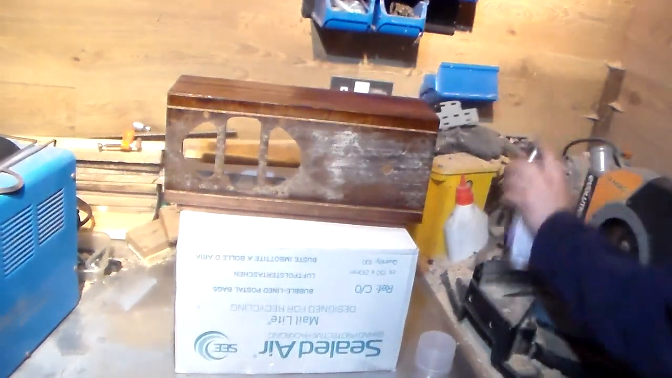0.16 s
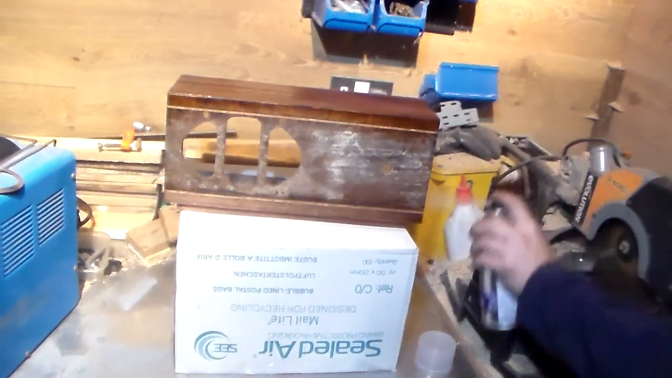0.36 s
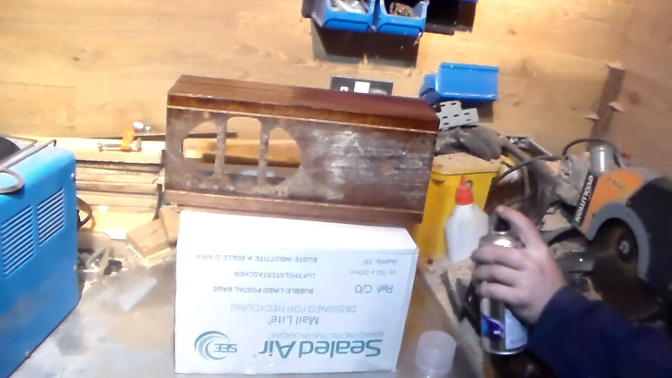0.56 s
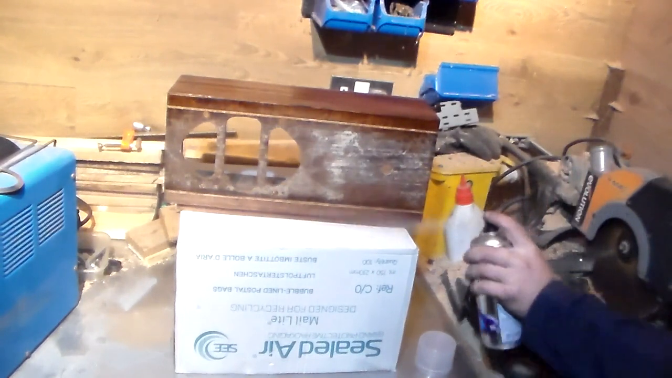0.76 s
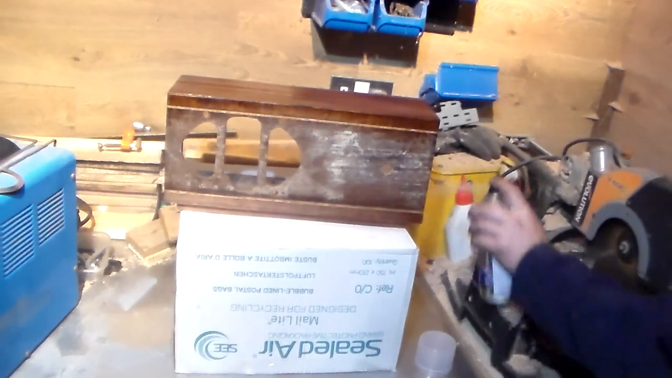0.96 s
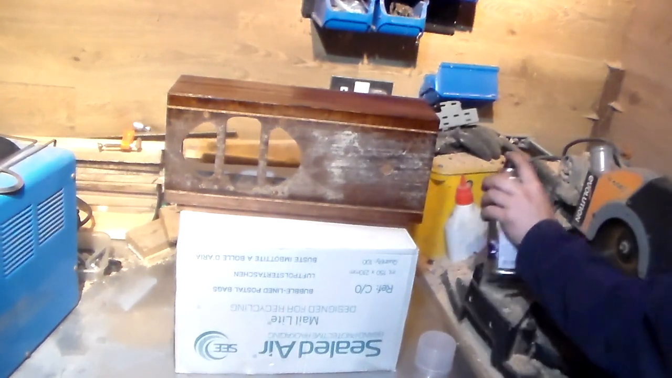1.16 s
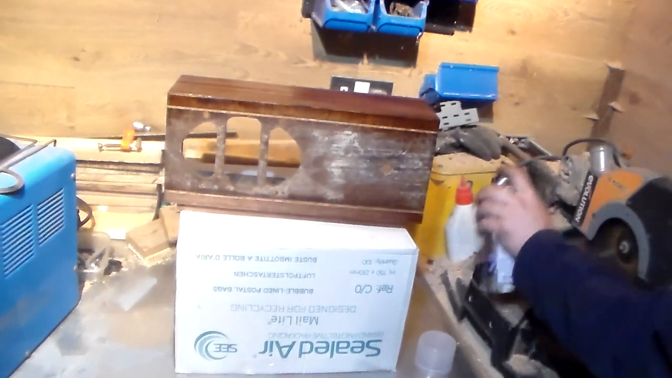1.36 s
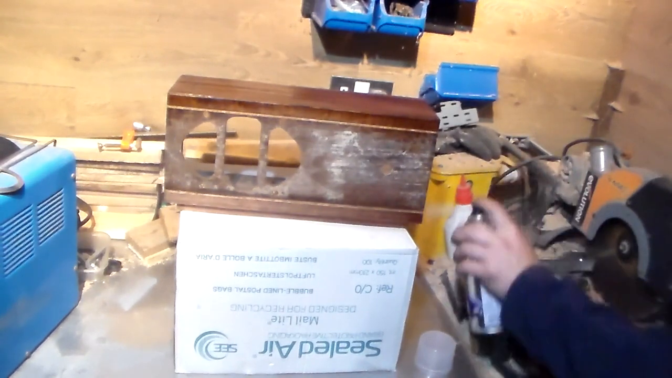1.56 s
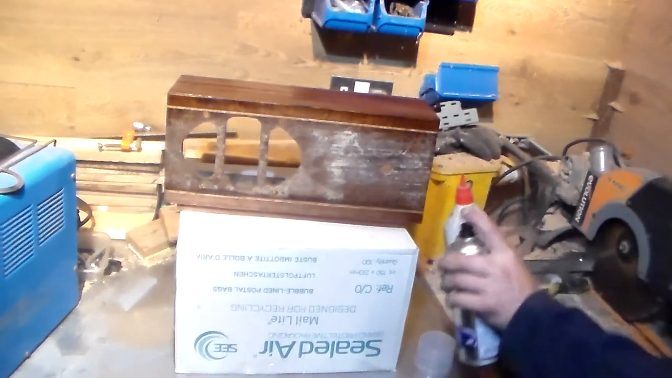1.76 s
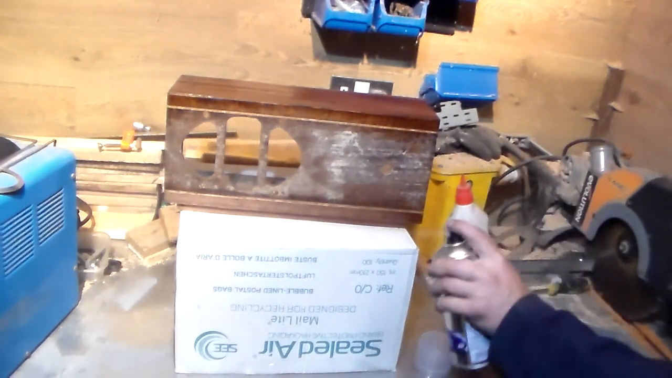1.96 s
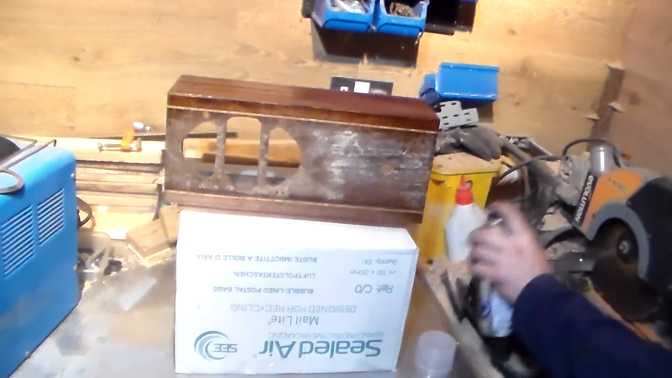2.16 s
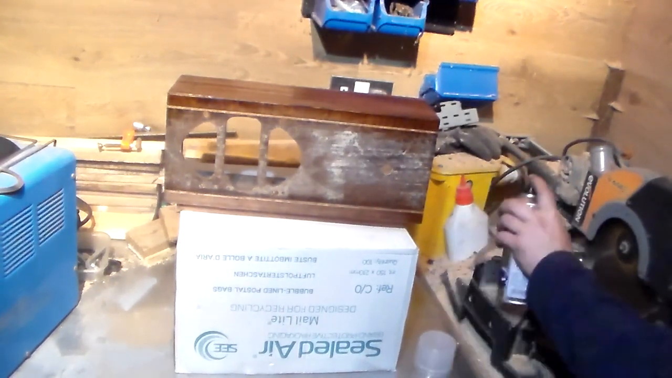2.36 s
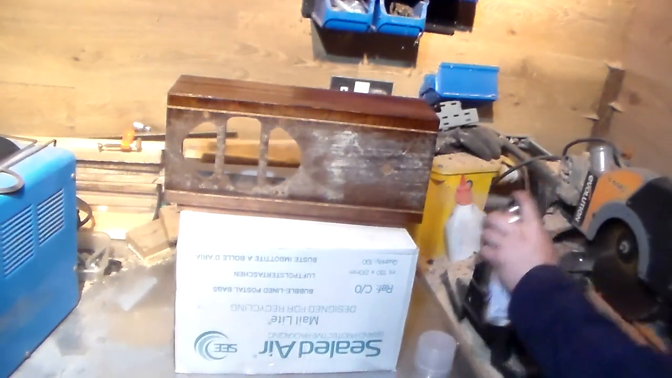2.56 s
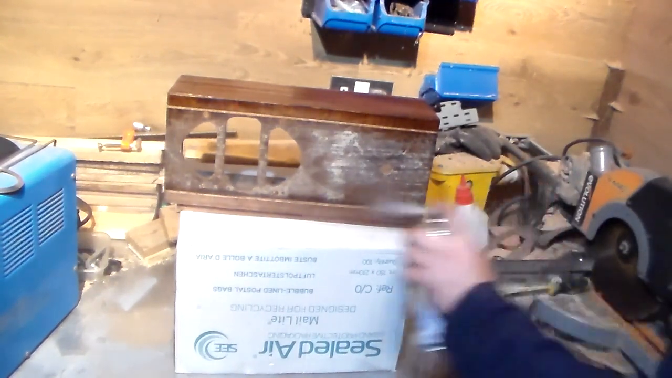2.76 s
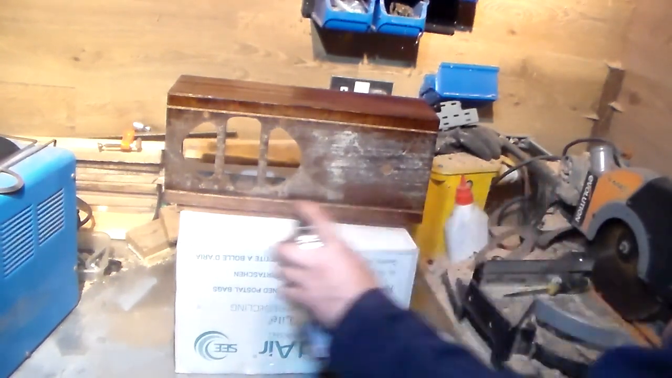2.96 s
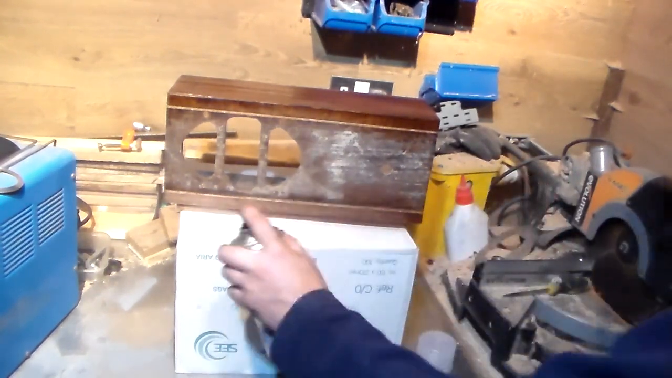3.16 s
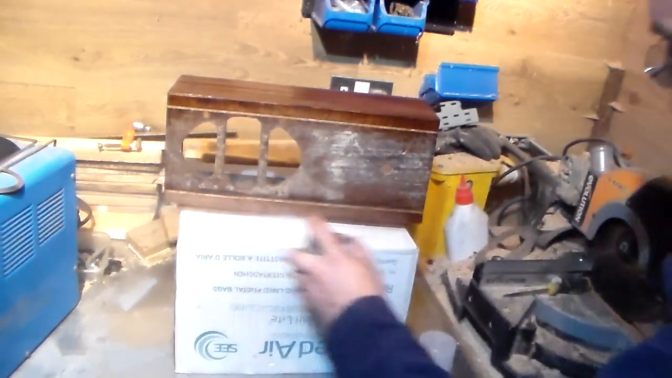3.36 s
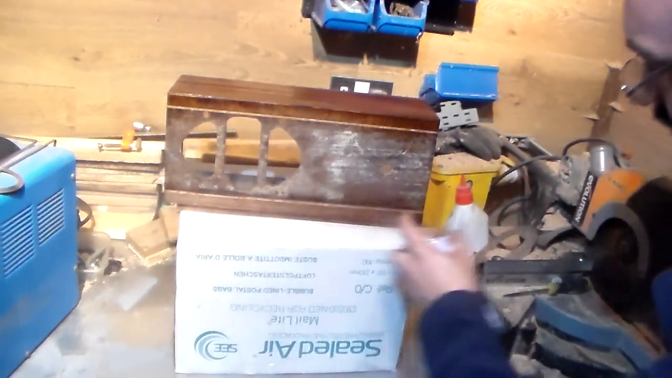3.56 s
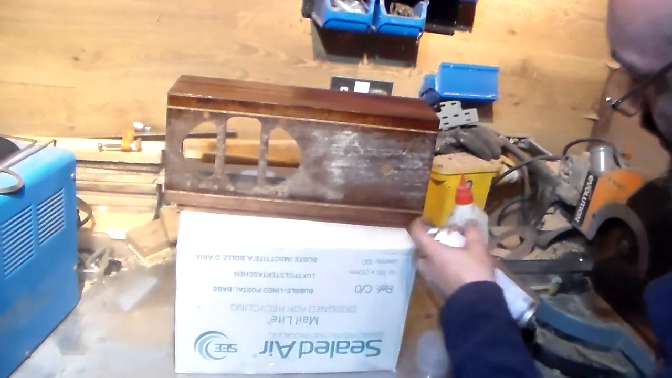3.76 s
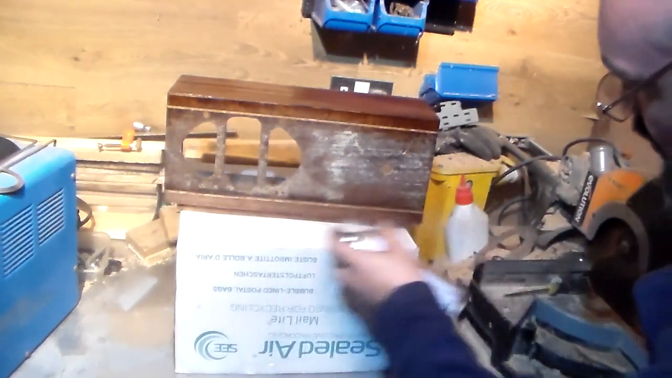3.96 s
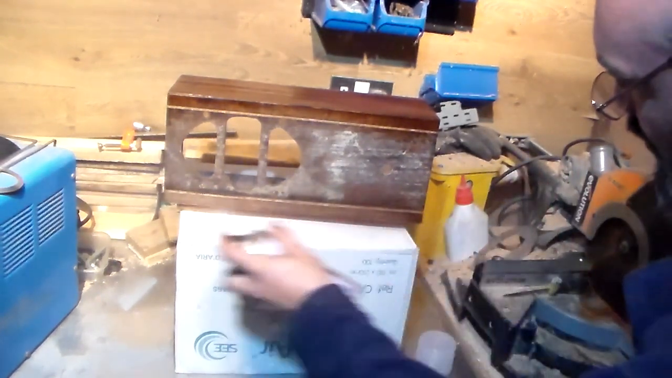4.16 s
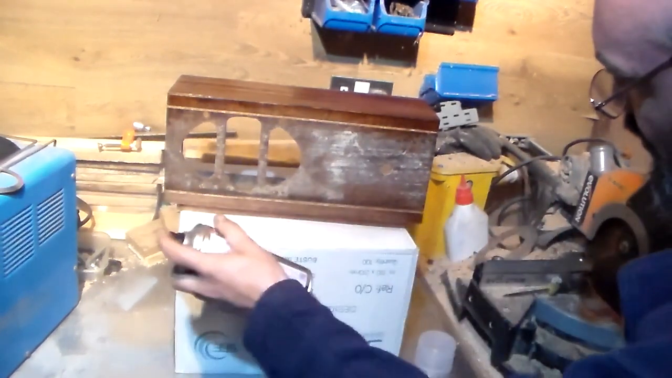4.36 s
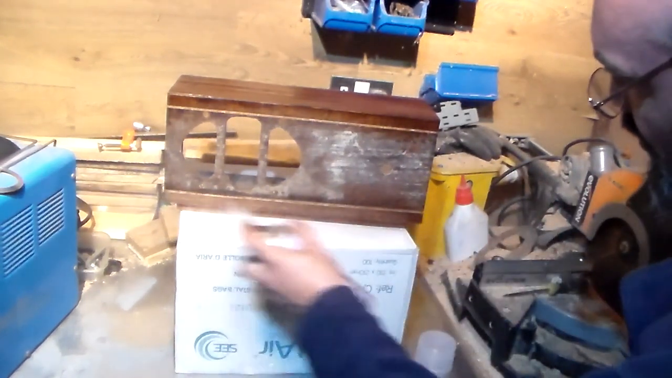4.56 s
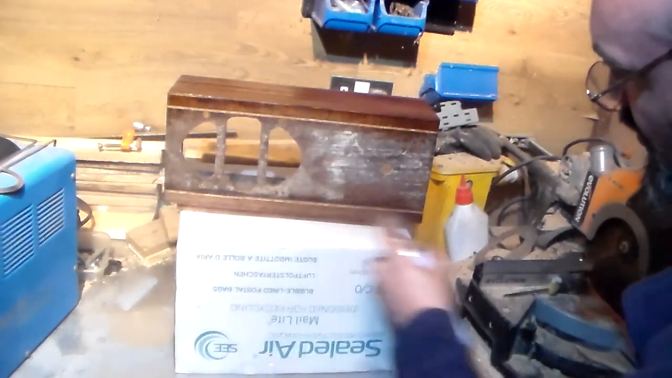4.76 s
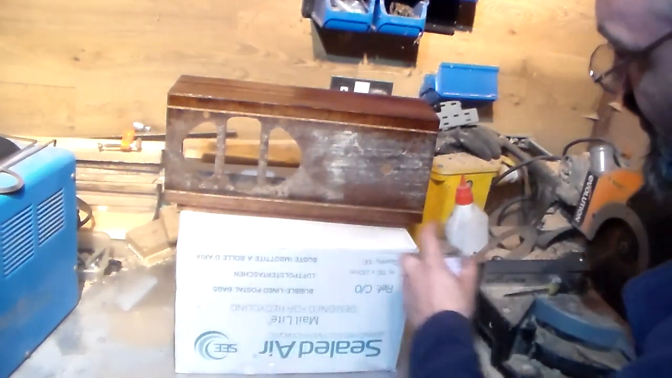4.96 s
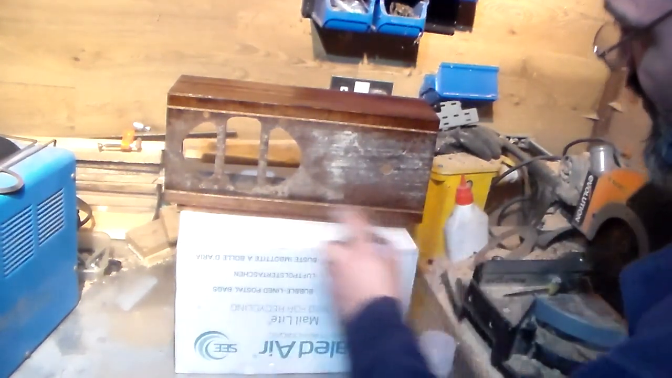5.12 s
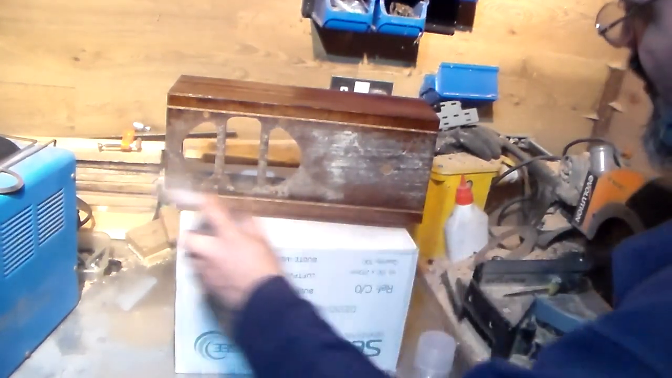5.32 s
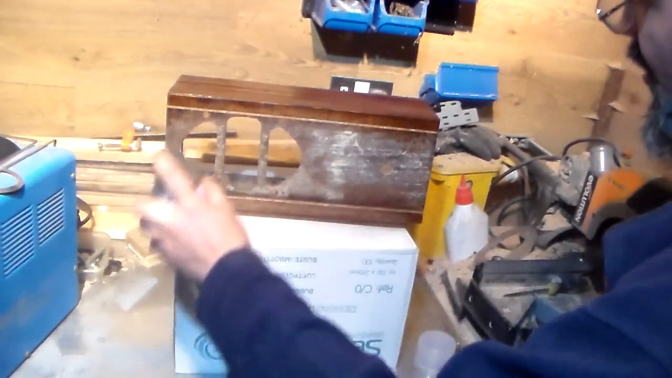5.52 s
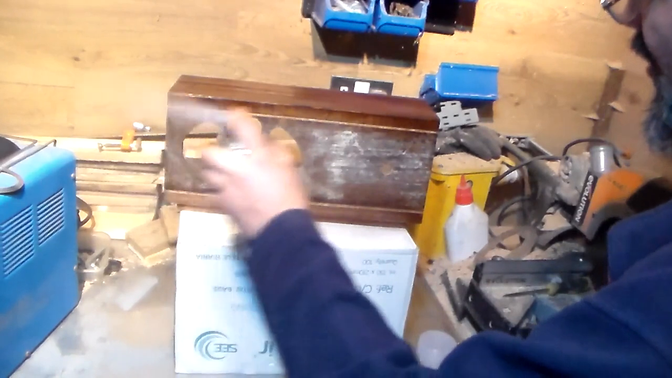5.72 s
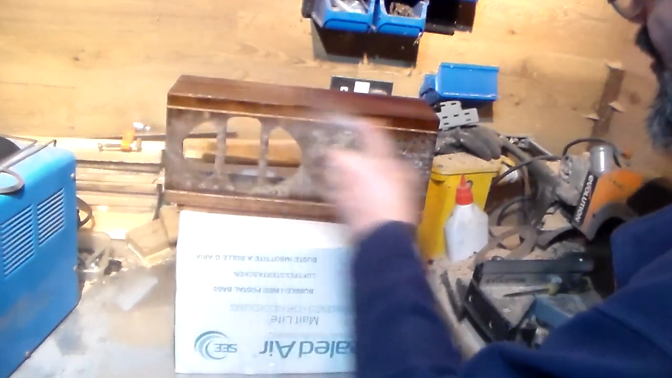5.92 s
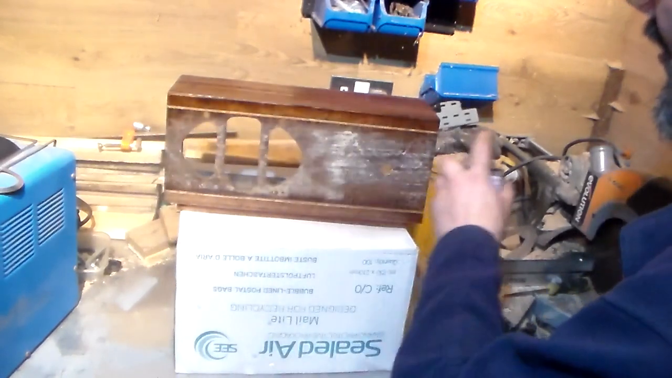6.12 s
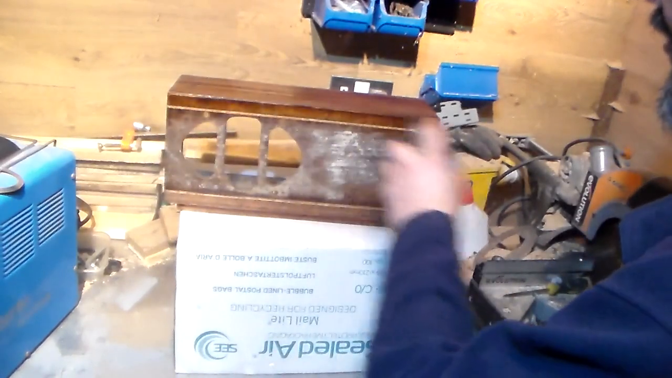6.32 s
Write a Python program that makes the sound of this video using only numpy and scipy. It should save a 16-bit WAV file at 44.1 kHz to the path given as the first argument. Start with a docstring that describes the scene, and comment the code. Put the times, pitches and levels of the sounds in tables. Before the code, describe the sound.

Short, crisp spray-can hisses with brief pauses, metallic ball clicks and rolls between them, one dull wooden knock, faint low hum behind.

```python
"""An aerosol can sprays lacquer on a wooden piece in short bursts, heard in stereo in a small workshop.
Filtered noise makes the nozzle's hiss, the splash and the wood's boom; a bench echo slides as the hand sweeps.
Between bursts the mixing ball rolls (noise around the can's modes) and clicks (noise cracks, ringing modes).
Narrow swishes glide past, and once something wooden is bumped: a dull crack and damped modes.
Behind it all lie faint air noise, a low machine drone and mains hum."""
import sys
import numpy as np
from scipy import signal
from scipy.fft import rfft, irfft, next_fast_len
from scipy.io import wavfile
from scipy.ndimage import uniform_filter1d, map_coordinates

SR = 44100
rng = np.random.default_rng(int(sys.argv[2]) if len(sys.argv) > 2 else 0)


def bounce(signal):
    """Save signal as a 16-bit WAV file at the path given by the first command-line argument."""
    frames = np.transpose(np.atleast_2d(signal))
    limited = np.clip(frames, -1, 1)
    pcm = np.round(limited * 32767).astype(np.int16)
    wavfile.write(sys.argv[1], SR, pcm)


N = 286032


def amp(db):
    """Decibels to gain."""
    return 10 ** (np.asarray(db) / 20)


def unit(x):
    """Scale to rms 1."""
    return x / np.sqrt(np.mean(x ** 2) + 1e-20)


def along(points, hz):
    """(frequency [Hz], value) points read on a log frequency axis."""
    point_hz, value = np.transpose(points)
    return np.interp(np.log(hz + 1), np.log(point_hz), value)


def wobble(rate):
    """A smooth random curve, rate knots a second."""
    knots = rng.standard_normal(int(N * rate / SR) + 4)
    return map_coordinates(knots, [np.arange(N) * rate / SR])


def filtered(x, response):
    """x times a response of frequency."""
    size = x.shape[-1]
    padded = next_fast_len(size + 8192)
    gain = response(np.fft.rfftfreq(padded, 1 / SR))
    return irfft(rfft(x, padded) * gain, padded)[..., :size]


def noise(colour, width, size=N):
    """Left and right noise whose middle has rms 1; colour is a gain of frequency."""
    mid, side = filtered(rng.standard_normal((2, size)), colour)
    side = filtered(side, lambda hz: amp(along(width, hz)))
    return np.array([mid + side, mid - side]) / np.std(mid)


def add(track, s, sound):
    """Mix a sound in at time s."""
    part = track[:, round(s * SR):][:, :sound.shape[-1]]
    part += sound[:, :part.shape[-1]]


def stroke(s, held_s, rise_s, release_s):
    """Gain of one gesture: it rises from time s, holds, then falls ever faster, by 60 dB in release_s."""
    rise_ease = 1.56  # above 1, a gesture starts gently
    t = np.maximum(np.arange(N) / SR - s, 0)
    closing = np.clip((t - held_s) / release_s, 0, 2)
    return (1 - np.exp(-t / rise_s)) ** rise_ease * amp(-60 * closing ** 2)


def ramp(s, length_s):
    """Runs from -1/2 to 1/2 over a gesture."""
    return np.clip((np.arange(N) / SR - s) / length_s, 0, 1) - .5


# stereo spread of the near sounds at the two microphones: (frequency [Hz], side minus mid [dB])
NEAR_WIDTH = [(100, -22), (400, -19), (1500, -29), (3300, -29), (4000, -10), (4800, -7), (6500, -4),
              (8200, -2), (11000, -1.5), (14000, -.7)]


def ring(modes, t, scatter_db, rise_cycles):
    """Damped modes that build up over a few cycles; high ones reach the two microphones out of step."""
    out = np.zeros((2, len(t)))
    for hz, db, t60 in modes:
        lead = np.arctan(amp(along(NEAR_WIDTH, hz)))
        phase = rng.uniform(0, 2 * np.pi) + np.array([[lead], [-lead]])
        rise = 1 - np.exp(-t * hz / rise_cycles)
        decay = amp(db + rng.normal(0, scatter_db) - 60 * t / t60)
        out += decay * rise * np.sin(2 * np.pi * hz * t + phase)
    return out


def gliding(centre_hz, width_hz):
    """A narrow band of noise of rms 1 around a moving centre: low noise multiplied by a gliding sine."""
    mean_hz = np.mean(centre_hz)
    spread = [(mean_hz, along(NEAR_WIDTH, mean_hz))]
    band = noise(lambda hz: 1 / (1 + (hz / width_hz) ** 2), spread, size=len(centre_hz))
    return np.sqrt(2) * band * np.sin(2 * np.pi * np.cumsum(centre_hz) / SR)


# the workshop's air noise: (frequency [Hz], relative density [dB per Hz])
AIR_COLOUR = [(12, -34.5), (20, 1.5), (52, -12), (176, -20.5), (304, -23.5), (513, -26.5), (573, -24.5),
              (754, -27), (1080, -27), (1720, -29), (1970, -27), (2270, -30), (2670, -27.5), (3820, -31.5),
              (14300, -38)]
# its stereo spread: (frequency [Hz], side minus mid [dB])
AIR_WIDTH = [(25, -7), (70, -3.5), (300, -1.5), (1500, -4), (4000, -3), (12000, 1)]


def background():
    """The workshop's faint air noise with a low machine drone and mains hum, both wavering in level."""
    t = np.arange(N) / SR
    air = amp(-56.5) * noise(lambda hz: amp(along(AIR_COLOUR, hz)), AIR_WIDTH)
    drone = amp(-56.5 + 2 * wobble(5)) * np.sin(2 * np.pi * 25 * t)
    hum = amp(-62 + 2.2 * wobble(2.94)) * np.sin(2 * np.pi * 50 * t)
    return air + drone + hum


# reverberation of the small workshop: (frequency [Hz], time to fall 60 dB [s])
ROOM_T60 = [(150, 0.41), (1000, 0.17), (5000, 0.17), (14000, 0.1)]


def room(x):
    """The small room's tail of decaying noise, each frequency dying at its own speed."""
    burst = noise(np.ones_like, NEAR_WIDTH, size=SR // 2)
    hz, t, spectrum = signal.stft(burst, SR, nperseg=256)
    decay = amp(-60 * t / along(ROOM_T60, hz)[:, None])
    tail = signal.istft(spectrum * decay, SR, nperseg=256)[1]
    # the tail begins 5 ms after the direct sound
    tail = np.pad(tail / np.linalg.norm(tail[0]), ((0, 0), (SR // 200, 0)))
    return signal.fftconvolve(x, tail, axes=1)[:, :N]


# a wooden bump and its softer rebounds:
# (time [s], relative level [dB], highest frequency that the contact excites [Hz])
WOOD_BUMPS = [(1.127, -22.5, 6000), (1.165, -34.5, 1200), (1.243, -35.5, 1500)]
# modes of the wood: (frequency [Hz], relative level [dB], time to fall 60 dB [s])
WOOD_MODES = [(60, -19, .2), (110, -17, .28), (164, -13, .23), (239, -4, .12), (256, -4, .15),
              (297, -9, 0.17), (330, -10.5, 0.15), (395, -10, .1), (618, -6.5, 0.1), (792, -4, .11),
              (1105, -7.5, 0.12), (1720, -8, 0.044), (1920, -5, 0.066), (3157, 2, .07)]
# dull crack of the contact: (frequency [Hz], relative density [dB per Hz])
THUD_COLOUR = [(70, -18), (300, -2), (600, 0.5), (1200, -2), (1800, 3.5), (3200, -5), (4200, -5),
               (9000, -33)]


def bumps():
    """Something wooden is knocked and settles: a dull crack, then its modes swell and die."""
    out, t = np.zeros((2, N)), np.arange(SR // 2) / SR
    for s, db, contact_hz in WOOD_BUMPS:
        crack = noise(lambda hz: amp(along(THUD_COLOUR, hz)), NEAR_WIDTH, size=len(t))
        crack *= amp(-60 * t / 0.13)
        blow = crack + amp(-2) * ring(WOOD_MODES, t, scatter_db=0.5, rise_cycles=3.2)
        # a softer contact leaves the highs out
        add(out, s, amp(db) * filtered(blow, lambda hz: 1 / (1 + (hz / contact_hz) ** 4)))
    return out


# the ball striking the can:
# (time [s], relative level [dB], relative level of the two low wall modes within the click [dB])
BALL_CLICKS = [(0.177, -28, -18), (0.2105, -23, -24), (0.2394, -18, -25), (1.2008, -21, -30),
               (2.452, -23, -14), (2.455, -20.5, -19), (2.475, -29, -12), (3.093, -37, -4),
               (4.0982, -17.5, -6.5), (6.2009, -20.5, -17), (6.3177, -21, -0.5), (6.3218, -20, -7),
               (6.3674, -19.5, -25)]
# modes of the can's steel wall: (frequency [Hz], relative level [dB], time to fall 60 dB [s])
CAN_MODES = [(1880, -5, 0.084), (2024, -2.5, 0.048), (4420, -1, .07), (4550, -2.5, 0.13),
             (5700, -15, 0.091), (6430, -12, 0.09), (7330, 1, 0.077), (7600, -20, .07), (8900, -4, .08),
             (9700, -11, 0.094), (10610, -21, .07), (12200, -17, .07)]
# crack of the ball on steel: (frequency [Hz], relative density [dB per Hz])
STEEL_COLOUR = [(1200, -38.5), (1900, -6), (3000, -2.5), (5000, 2), (7200, -0.5), (10000, -5),
                (14000, -11.5)]


def clicks():
    """The ball hits the wall: a short rattling crack and the ring of the steel."""
    out, t = np.zeros((2, N)), np.arange(SR // 4) / SR
    for s, db, low_db in BALL_CLICKS:
        crack = noise(lambda hz: amp(along(STEEL_COLOUR, hz)), NEAR_WIDTH, size=len(t))
        crack *= amp(-60 * t / 0.12)
        low = ring(CAN_MODES[:2], t, scatter_db=0, rise_cycles=2)
        high = ring(CAN_MODES[2:], t, scatter_db=2.5, rise_cycles=3)
        click = amp(-13.5) * crack + amp(low_db - 3.5) * low + amp(-14) * high
        add(out, s, amp(db) * click)
    return out


def wall(hz, modes):
    """Gain of the can's wall: the lacquer and the hand broaden each mode."""
    power = 0
    for mode_hz, db, t60 in modes:
        power = power + amp(db) ** 2 / (1 + ((hz - mode_hz) * t60 / 5) ** 2) ** 1.4
    return np.sqrt(power)


# the ball rolling round the can's base: (time [s], length [s], relative rolling level [dB],
# relative scraping level [dB], swell from start to end [dB],
# main mode, which the shifting lacquer pulls down [Hz])
BALL_ROLLS = [(.03, 0.18, -53.5, -58, 12, 4510), (.66, 0.14, -66, -64, 11, 4510),
              (1.19, 0.061, -60, -50.5, -4.5, 4540), (1.92, 0.13, -64, -59, 6, 4550),
              (2.36, 0.18, -50, -55, 4, 4570), (3.05, 0.112, -53.5, -61, -3, 4580),
              (4.85, 0.049, -43.5, -58, -8, 4420), (5.01, 0.14, -66, -62.5, 2, 4550),
              (5.5, 0.15, -57.5, -59, 4, 4320), (6.228, 0.072, -46.5, -53, -12, 4500)]


def rolling():
    """Smooth rolling sings in the can's main mode; scraping wakes the others."""
    roll, scrape = np.zeros((2, N))
    for s, length_s, roll_db, scrape_db, swell_db, _ in BALL_ROLLS:
        speed = stroke(s, length_s, rise_s=.006, release_s=0.054)
        speed *= amp(swell_db * ramp(s, length_s))
        roll += amp(roll_db) * speed
        scrape += amp(scrape_db) * speed
    start, length, *_, mode_hz = np.transpose(BALL_ROLLS)
    # the main mode drifts from the middle of one roll to the middle of the next
    main_hz = np.interp(np.arange(N) / SR, start + length / 2, mode_hz)
    song = roll * gliding(main_hz, width_hz=86)
    other_modes = CAN_MODES[:2] + CAN_MODES[4:]
    colour = lambda hz: wall(hz, other_modes) + amp(-4 + along(STEEL_COLOUR, hz))
    rasp = scrape * noise(colour, NEAR_WIDTH)
    # the ball keeps skipping off the wall
    return (amp(-3.0) * song + amp(3) * rasp) * amp(2.0 * wobble(120))


# narrow swishes that glide as the hand moves: (time [s], length [s], from [Hz], to [Hz],
# half-width where the gain has halved [Hz], relative level at the peak of the swell [dB])
HAND_SWISHES = [(0.738, 0.046, 8350, 6200, 650, -49.5), (2.778, 0.2, 1123, 1450, 80, -47.5),
                (3.42, 0.26, 2350, 2805, 110, -46.5), (3.968, .13, 3880, 3200, 120, -39.5),
                (4.021, 0.275, 1787, 1646, 130, -47), (5.151, .13, 6500, 5880, 130, -35)]


def swishes():
    """Narrow bands of noise that swell, glide and fade."""
    out = np.zeros((2, N))
    for s, length_s, from_hz, to_hz, width_hz, db in HAND_SWISHES:
        u = np.linspace(0, 1, round(length_s * SR))
        band = gliding(from_hz + (to_hz - from_hz) * u, width_hz)
        add(out, s, amp(db) * np.sin(np.pi * u) * band)
    return out


def swept(x, path_m, sweep_m, share):
    """An echo whose extra path changes with the hand: a comb that slides through the hiss."""
    delay = np.abs(path_m + sweep_m * wobble(2.5)) / 343 * SR  # samples, at 343 m/s
    echo = np.array([map_coordinates(c, [np.arange(N) - delay], order=3) for c in x])
    return (x + share * echo) / np.hypot(1, share)


def patchy(x, depth_db):
    """Scattering off the clutter lifts and lowers small patches of the spectrum."""
    spectrum = signal.stft(x, nperseg=1024)[2]
    field = rng.standard_normal(spectrum.shape[1:])
    field = uniform_filter1d(field, size=4, axis=0)  # across frequency
    field = uniform_filter1d(field, size=8, axis=1)  # across time
    gain = unit(amp(depth_db * unit(field)))
    return signal.istft(spectrum * gain, nperseg=1024)[1][:, :N]


# presses of the valve: (time [s], held [s], rise [s], release [s], relative jet level [dB],
# splash relative to the jet, before the layer trims [dB],
# boom of the wood relative to the splash, before the layer trims [dB])
VALVE_PRESSES = [ (-.1, .085, .02, 0.089, -42.5, -6, -1.5), (.223, 0.34, .018, .13, -32.7, -6.7, -0.5),
                 (0.783, .3, 0.027, 0.25, -33, -6.5, -1.5), (1.417, .27, 0.033, .14, -32, -7.5, 0),
                 (2.04, 0.24, 0.027, .16, -32, -7, -1.5), (2.569, 0.4, 0.059, 0.13, -31.5, -6.5, -2),
                 (3.234, .349, 0.023, .138, -31, -7.5, -2.5), (3.883, .39, 0.038, .138, -31.3, -5.2, -4.8),
                 (4.539, 0.27, 0.021, 0.15, -31, -7, -4.5), (5.123, 0.31, 0.024, 0.12, -31, -7.5, -3.5),
                 (5.702, 0.41, 0.019, 0.16, -32.5, -6.5, -2), (6.353, .2, 0.019, .12, -31.5, -5, -3)]
SAG_DB_PER_S = 5.5  # the pressure drops while the valve is held
SPLASH_GROWS = .85  # exponent: a weak flow throws coarser drops, so the splash changes less than the jet


def valve():
    """Gains of jet, splash and boom: all three follow the flow through the valve."""
    jet, splash, boom = np.zeros((3, N))
    for s, held_s, rise_s, release_s, jet_db, splash_db, boom_db in VALVE_PRESSES:
        sag = amp(-SAG_DB_PER_S * held_s * ramp(s, held_s))
        flow = stroke(s, held_s, rise_s, release_s) * sag
        drops = amp(jet_db + splash_db) * flow ** SPLASH_GROWS
        jet += amp(jet_db) * flow
        splash += drops
        boom += amp(boom_db) * drops
    return jet, splash, boom


# the spray's hiss: (frequency [Hz], relative density [dB per Hz])
HISS_COLOUR = [(70, -39), (170, -24), (290, -13.8), (450, -13.8), (1200, -12.5), (1800, -10.5),
               (2400, -7.5), (3400, -5), (4200, -4), (6200, -0.9), (8000, -1.85), (9800, 1.1), (12500, -1),
               (14300, -5)]
# resonances and dips of the bench and its clutter: (frequency [Hz], width [Hz], height [dB])
BENCH_PEAKS = [(256, 26, 2), (780, 50, -1), (1060, 48, 2), (1694, 87, 2), (2625, 310, 3.5),
               (2916, 170, -4.5), (4110, 350, -1.4), (7030, 200, 3)]


def spray():
    """A bright turbulent jet at the nozzle, a duller splash where it meets the work, and the wood's boom."""
    def colour(hz):
        peaks = sum(db / (1 + (2 * (hz - f) / w) ** 2) for f, w, db in BENCH_PEAKS)
        return amp(along(HISS_COLOUR, hz) + peaks)

    def above(hz, split_hz):  # share of the power above a split
        return 1 / (1 + (split_hz / (hz + 1)) ** 4)

    jet, splash, boom = valve()
    high = noise(lambda hz: colour(hz) * np.sqrt(above(hz, 3840)), NEAR_WIDTH)
    middle = noise(lambda hz: colour(hz) * np.sqrt(above(hz, 1240) * (1 - above(hz, 4180))), NEAR_WIDTH)
    low = noise(lambda hz: colour(hz) * np.sqrt(1 - above(hz, 1270)), NEAR_WIDTH)
    hiss = amp(3.0) * jet * high + amp(2.5) * splash * middle + amp(-8.0) * boom * low
    # the aim wanders, and droplets leave the nozzle unevenly, so the flow flutters
    hiss *= amp(0.21 * wobble(12) + 0.27 * wobble(40) + 0.48 * wobble(500))
    # the bench echo travels about half a metre further than the direct sound
    return patchy(swept(hiss, path_m=.55, sweep_m=0.1014, share=0.23), depth_db=2.5)


def scene():
    """Spray, can, swishes and bump in the room, a touch louder on the left, over its background."""
    hiss = spray()
    small = rolling() + clicks() + bumps() + swishes()
    near = hiss + small + room(amp(-9) * hiss + amp(-8.5) * small)
    return near * amp([[.25], [-.25]]) + background()


def record(dry):
    """A very steep low-pass: almost nothing is kept above the band limit."""
    top_hz = 14400
    return filtered(dry, lambda hz: 1 / (1 + (hz / top_hz) ** 500))


dry = scene()
out = record(dry)
bounce(out)
```